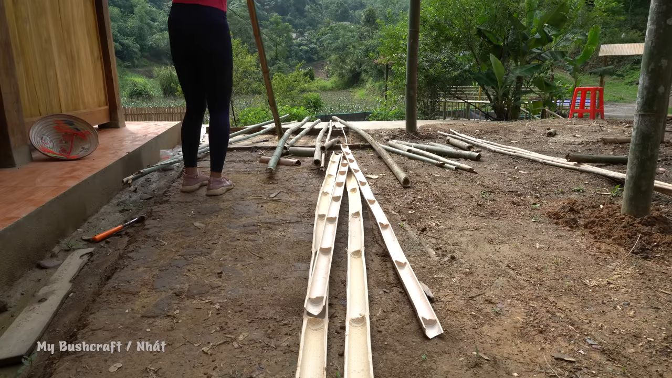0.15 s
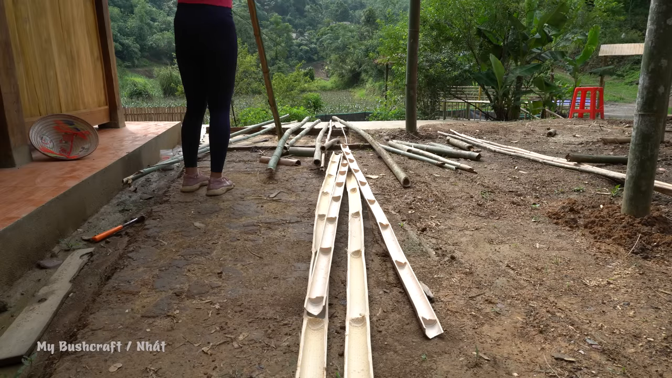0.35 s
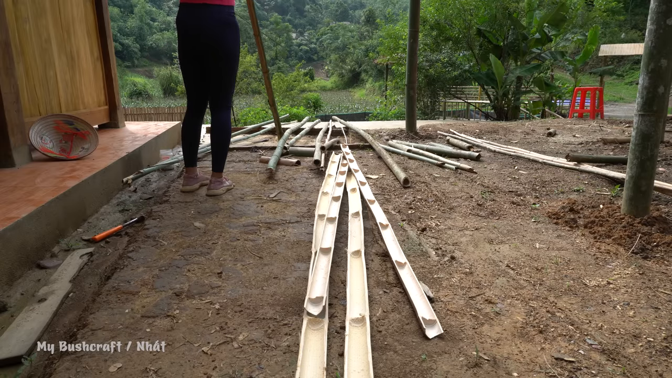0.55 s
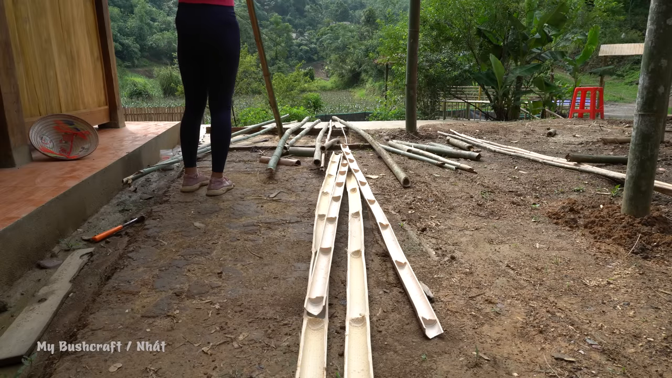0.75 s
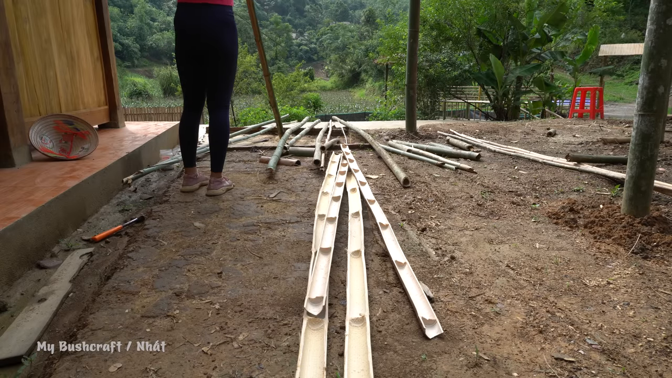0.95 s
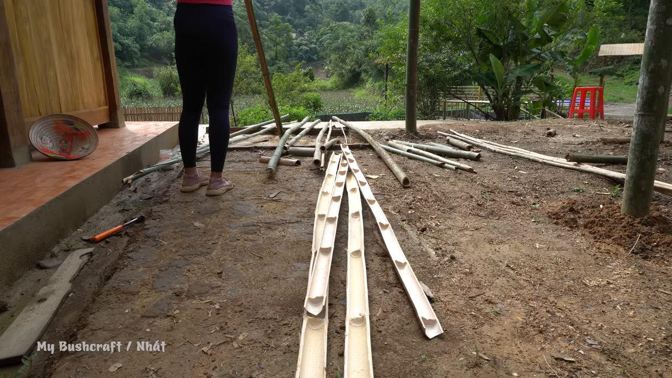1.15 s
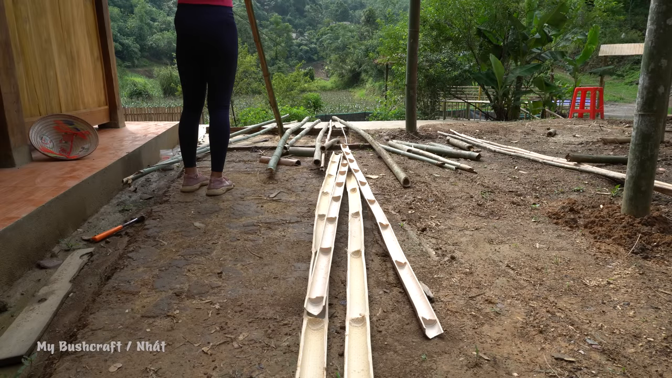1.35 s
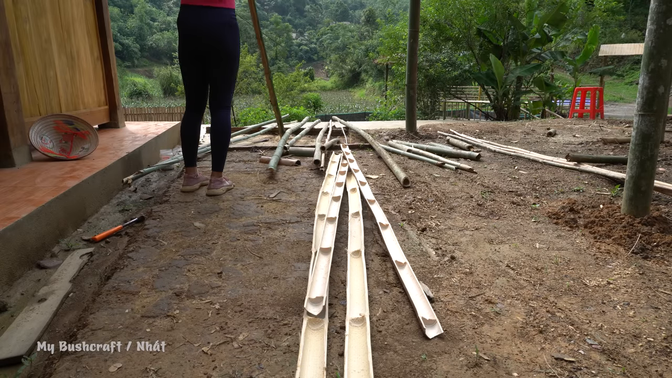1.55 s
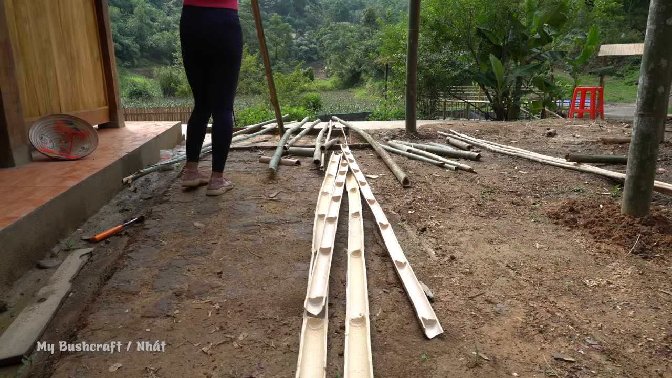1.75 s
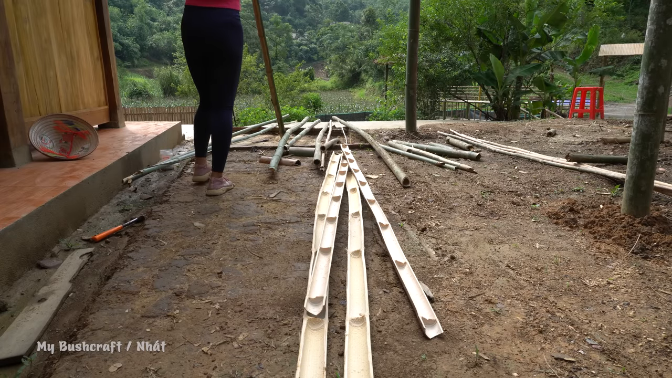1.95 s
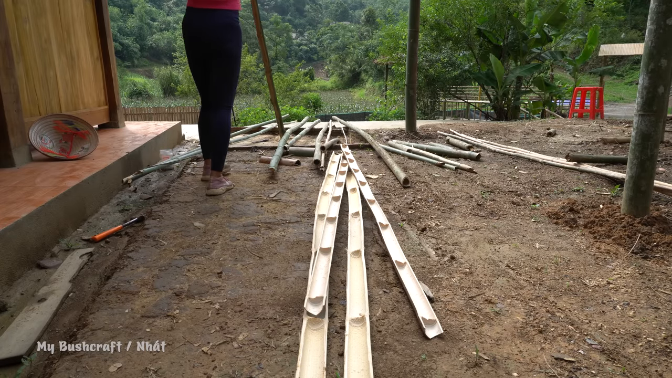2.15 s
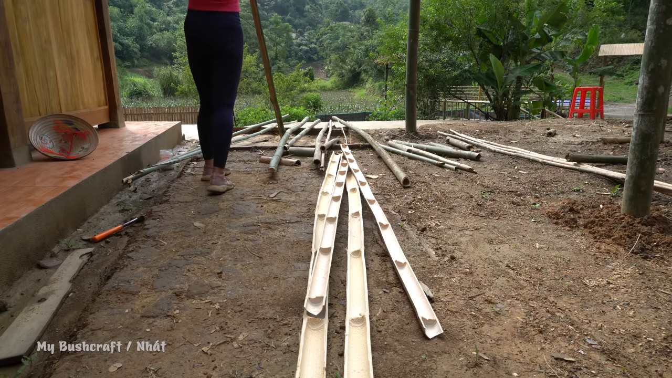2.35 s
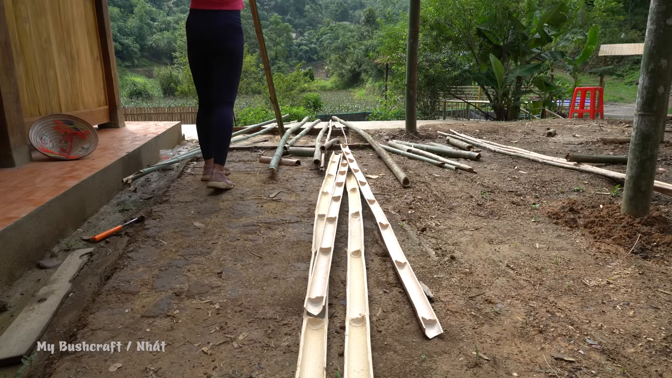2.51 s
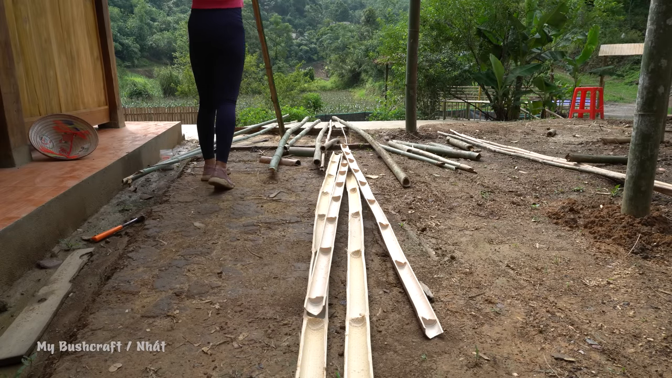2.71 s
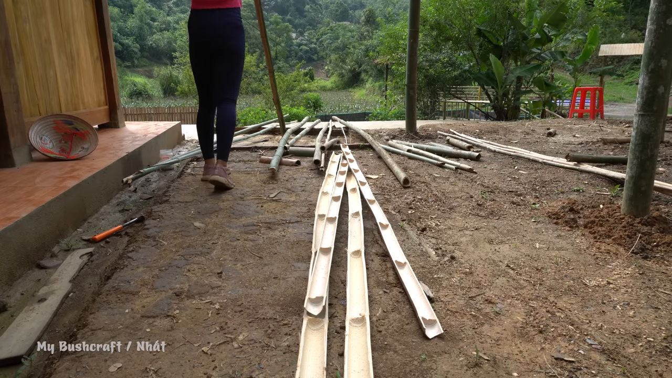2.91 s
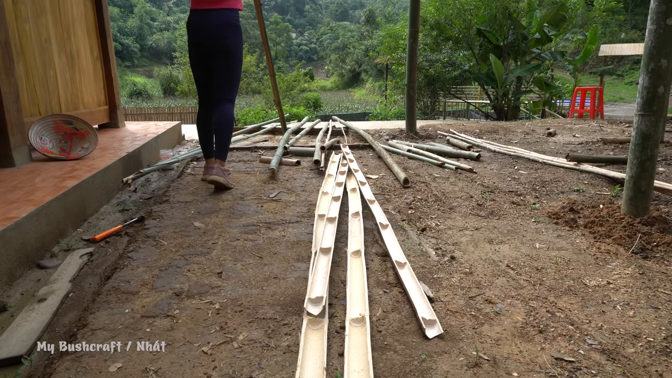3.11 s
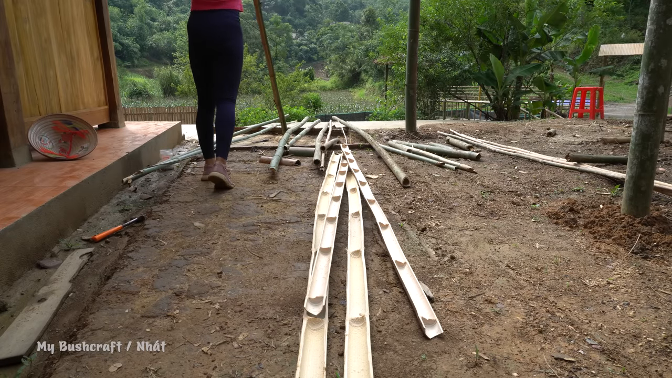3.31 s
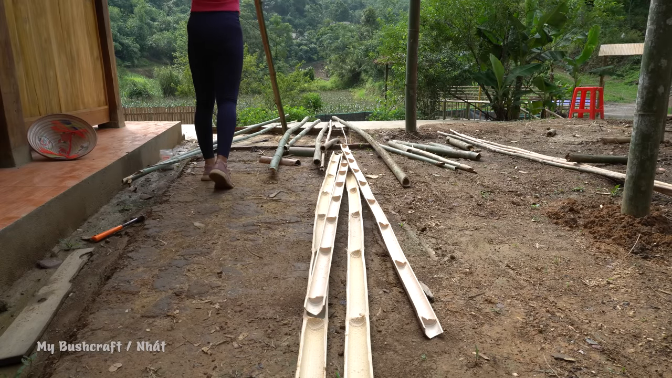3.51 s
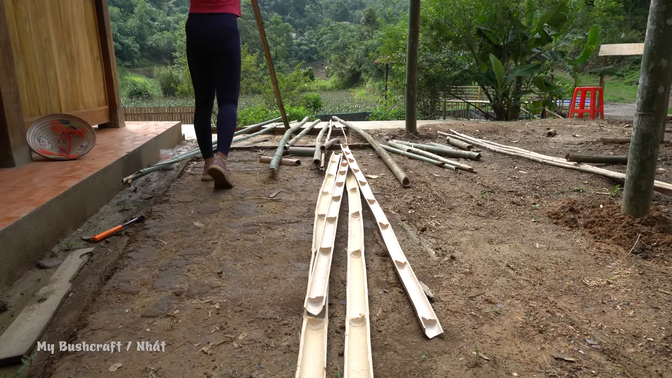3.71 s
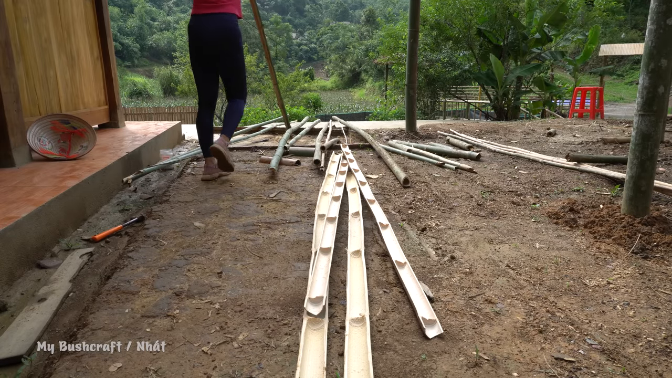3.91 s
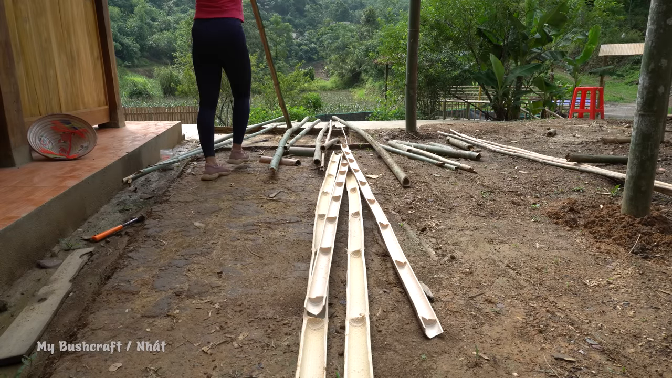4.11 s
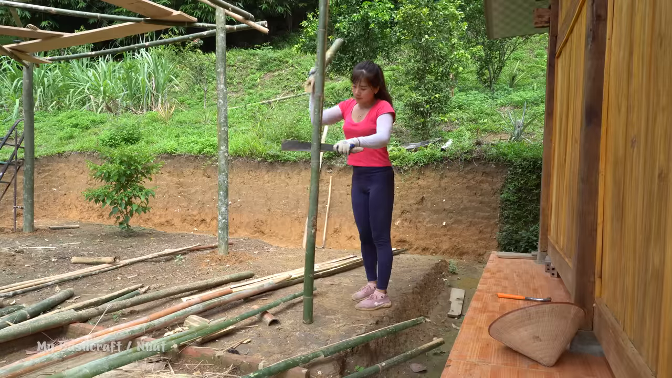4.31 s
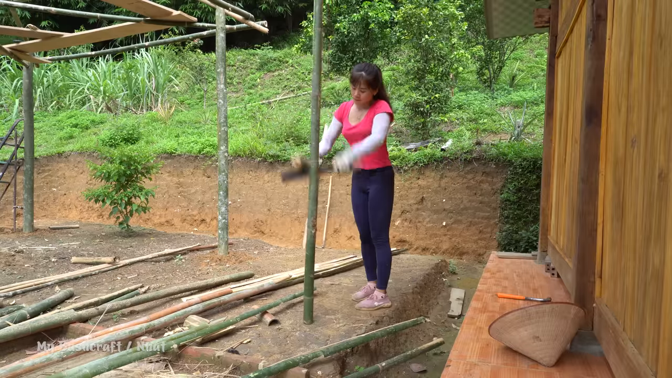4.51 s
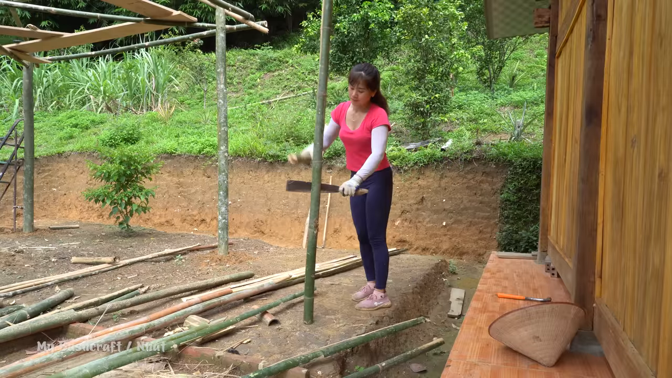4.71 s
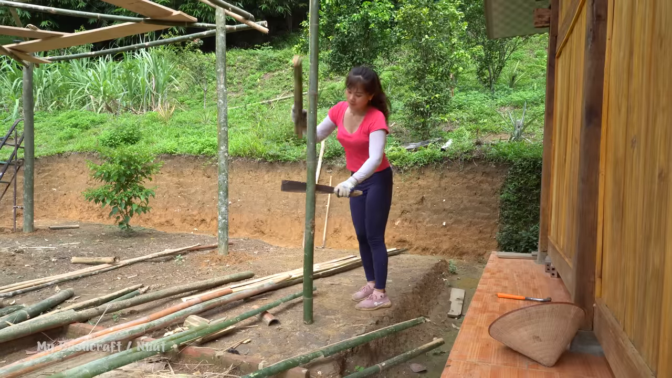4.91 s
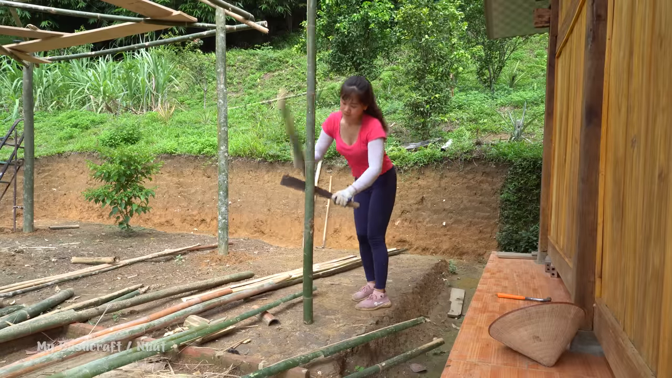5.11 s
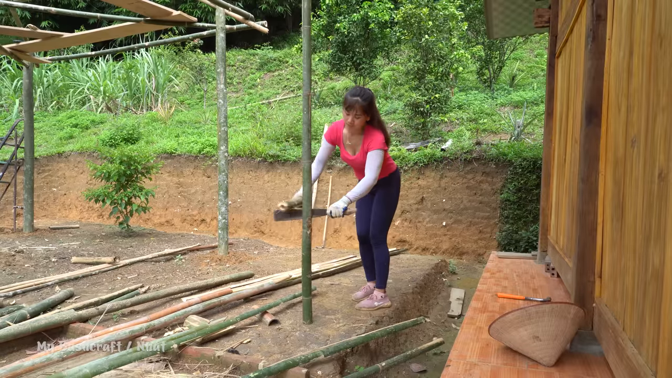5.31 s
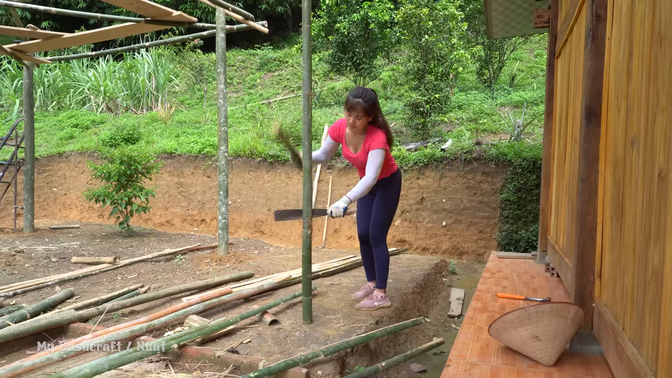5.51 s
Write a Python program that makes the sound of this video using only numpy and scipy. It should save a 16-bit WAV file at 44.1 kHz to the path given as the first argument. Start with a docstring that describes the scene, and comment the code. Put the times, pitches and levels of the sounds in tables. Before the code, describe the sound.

Bamboo splitting heard in stereo from a few metres away: five blows on one pole slightly left, the third only a soft thud, each followed by brief wall and ground echoes. Splits tear on in dry, uneven crackles. After an abrupt change of spot, two blows land on another pole, with longer echoes and a short rubbing hum before the last. Steady insect hiss continues behind.

```python
"""Splitting bamboo in a farmyard

A wooden club knocks a machete down through standing bamboo poles, a few metres away.
Most blows ring the hollow pole (fading sine tones, thud and crack of noise); the third is mainly a dull thud.
The split runs on in bursts of random fibre snaps; house wall and ground send back echoes of fading noise.
Insects (filtered noise) hiss in the trees; the last two blows hit a second pole, heard from another spot."""
import sys
import numpy as np
from scipy import signal
from scipy.fft import rfft, irfft, next_fast_len
from scipy.io import wavfile

SR = 44100
rng = np.random.default_rng(int(sys.argv[2]) if len(sys.argv) > 2 else 0)


def persist_wave(psi):
    """Save psi, clipped to +-1, as 16-bit WAV."""
    counts = np.round(np.clip(psi, -1, 1) * 32767).astype(np.int16)
    wavfile.write(sys.argv[1], SR, np.atleast_2d(counts).T)


N = 245195
TIME = np.arange(N) / SR

# All levels are relative. A fade_s is the time a sound takes to sink by 60 dB.
# blows: start_s, hollow_ring_db, ring_hz, wall_knock_db, club_thud_db, edge_crack_db, echo_fade_s, late_echo_db
BLOWS = [(0.6436, -8, 1542, -11, -19.5, -17.5, 0.23, -16.5),
         (1.3096, -6.5, 1529, -9, -18.5, -16, 0.19, -12), (1.8090, -56, 1310, -22, -14.5, -28, 0.12, -19.5),
         (2.9, -2, 1528, -6, -20.5, -11, 0.22, -13), (3.6032, -3, 1529, -8.5, -46, -15.5, 0.27, -7.5),
         (4.5550, -10.5, 1510, -9, -19, -9, 0.63, -3), (5.2407, -8.5, 1490, -8.5, -26, -16.5, 0.35, -10)]
# tones of the first pole's wall: pitch_hz, level_db, fade_s
FIRST_WALL = [(359, -29, 0.016), (605, -28, 0.099), (738, -17.5, 0.058), (951, -30, 0.11),
              (1410, -4, 0.0095), (1900, -39, 0.015), (2214, -6.5, 0.023), (3080, -32, .016),
              (3390, -8.5, 0.0064), (5530, -20.5, 0.015)]
# tones of the second pole's wall: pitch_hz, level_db, fade_s
SECOND_WALL = [(239, -22, 0.081), (424, -24.5, 0.083), (598, -18, 0.035), (780.6, -14, 0.1),
               (960, -10.5, 0.032), (1090, -21, 0.087), (1864, -12, 0.038), (2172, -9, 0.037),
               (2700, -14, 0.027), (3175, -16, 0.016), (4350, -11, 0.012)]
# wooden club on the back of the blade: pitch_hz, level_db
THUD = [(40, -47), (120, -19), (300, -16), (450, -0.5), (650, 6), (1000, -1), (1400, 2.5), (2000, -6.5),
        (3000, -15), (5000, -15), (16000, -39)]
# blade edge entering the cane: pitch_hz, level_db
CRACK = [(40, -45), (200, -18), (700, -10.5), (2000, 9), (4500, -6), (8000, -11), (12000, -9), (16000, -20)]
# the split running on: start_s, length_s, first_crackle_db, last_crackle_db, first_body_db, last_body_db
# It fades after a blow, or grows as the blade is levered; "body" is the shaking pole.
RUNS = [(0.66, 0.036, -28, -25, -22, -27.5), (0.72, 0.24, -37, -43, -36.5, -42),
        (1.323, 0.1, -53, -32.5, -25, -30.5), (2.162, 0.073, -42.5, -35.5, -46, -39),
        (2.719, 0.031, -30.5, -36.5, -39, -43.5), (2.811, 0.045, -33, -30, -56, -35.5),
        (2.952, 0.17, -22.5, -46, -20.5, -34), (3.548, 0.06, -50, -33, -59, -36),
        (3.627, 0.22, -33, -49, -25, -42), (4.088, 0.1, -47.5, -44, -51, -45.5),
        (4.603, 0.11, -32, -38, -16.5, -24.5), (5.27, 0.043, -23, -50, -22, -26.5)]
# loud jerks, where a whole bundle of fibres gives way: start_s, crackle_db, body_db
JERKS = [(0.726, -25.5, -24), (0.757, -26, -27), (0.784, -26.5, -22), (0.914, -34, -35),
         (1.328, -27.5, -18), (1.413, -30, -31), (2.17, -31.5, -43), (2.236, -27.5, -31.5),
         (2.779, -32.5, -55), (2.958, -21.5, -24), (2.994, -18, -31), (3.056, -20.5, -21),
         (3.094, -24, -23.5), (3.612, -18.5, -26), (4.556, -17.5, -49), (4.604, -21, -23)]
# snapping fibres: pitch_hz, level_db
FIBRES = [(300, -25.5), (1200, 1.5), (2600, 1), (4000, 2), (6000, 1.5), (8500, -1), (11000, -5.5),
          (14000, -5.5), (16000, -17.5)]
# the parted strips, rung by snapping fibres: pitch_hz, level_db, fade_s
STRIPS = [(1400, -9, 0.056), (2120, -8, 0.047), (2603, 3, 0.061), (2760, 3, 0.09), (3534, 3.5, 0.022),
          (3660, 6, 0.058), (4430, -27, 0.015), (5210, -12, 0.055)]
# the pole shaken by the split: pitch_hz, level_db
POLE = [(30, -40.5), (70, -22), (150, -12), (280, -4.5), (440, -10), (620, 3), (720, -5), (820, 3),
        (1050, -1.5), (1380, -3), (1800, -3), (2300, -6), (3200, -13.5), (6000, -18), (16000, -46)]
# woody bending tones of the first pole as it opens: pitch_hz, level_db, fade_s
FLEX = [(596, 0.5, 0.052), (632.6, -3.5, 0.054), (830, -31, 0.027)]
# insect chorus from each spot: pitch_hz, level_db
INSECTS_FIRST = [(1500, -21.5), (2200, -13.5), (2800, -8.5), (3400, -10.5), (4400, -7), (5100, -3.5),
                 (5650, 2), (6550, -11.5), (7500, -4.5), (8600, -8.5), (9600, -9), (10600, -18),
                 (12500, -22), (16000, -23.5)]
INSECTS_SECOND = [(1500, -29.5), (2100, -11), (2800, -5.5), (3300, -8.5), (4100, -1), (5000, -3), (5700, 3),
                  (6550, -7), (7600, 0), (9000, -5.5), (10200, -9), (11500, -15.5), (13000, -23),
                  (16000, -21)]
# thin insect whistles: pitch_hz, width_hz, level_db
WHISTLES = [(9200, 250, -58), (9990, 110, -60)]
# distant open-air rumble: pitch_hz, level_db
AIR = [(20, -9.5), (45, -7.5), (80, 2), (125, 1.5), (190, -7), (270, -4.5), (450, -9), (800, -11),
       (1500, -13.5), (2500, -25), (6000, -57), (16000, -56)]
# how alike left and right are, for far sounds and for the yard: pitch_hz, correlation
FAR_LIKENESS = [(60, 0.98), (130, 0.97), (290, 0.67), (640, 0.13), (1400, 0.14), (3000, 0.31), (7000, 0),
                (15000, 0.26)]
YARD_LIKENESS = [(100, 1), (500, 0.98), (1000, 0.89), (1600, 0.75), (3000, 0.44), (6000, 0.29),
                 (12000, 0.4)]

MOVE_S = 4.215   # from here on: second pole, other listening spot
HOLLOW_FADE_S = 0.019
# echo level and left-right balance of each pole's blows
FIRST_ECHO_DB, FIRST_SIDE_DB = 3.5, 1.4
SECOND_ECHO_DB, SECOND_SIDE_DB = 5.5, -1.2
RUN_ATTACK_S, CRACKLE_RELEASE_S, BODY_RELEASE_S = 0.0064, 0.004, 0.016
JERK_S = 0.011   # a jerk swells and dies on this time scale
# the cleft sticks and slips unevenly: each slip starts at once and sinks by SLIP_DB until the next
SLIPS_PER_S, SLIP_DB, SLIP_JITTER = 60, 7, 0.4
# the blade rubs in the cleft and the pole hums, swelling and sinking in pitch up to the last blow
RUB_START_S, RUB_END_S, RUB_RELEASE_S = 4.7, 5.238, 0.004
RUB_END_DB, RUB_SWELL_DB_PER_S = -44, 142
RUB_END_HZ, RUB_SAG_HZ_PER_S = 965, 750
CUTOFF_HZ = 15950


def amp(db):
    """Turn decibels into a plain factor."""
    return 10 ** (np.asarray(db) / 20)


def rms_one(x):
    """Scale a sound to an average strength (rms) of 1."""
    return x / np.sqrt(np.mean(x ** 2) + 1e-20)


def at_hz(points, hz):
    """Read a table between its points, on a logarithmic pitch scale."""
    table = np.array(points)
    return np.interp(np.log(hz + 1), np.log(table[:, 0]), table[:, 1])


def dying(t, fade_s):
    """Exponential fade that sinks by 60 dB in fade_s."""
    return np.exp(-np.log(1000) * t / max(fade_s, 1e-3))


def colour(x, spectrum):
    """Filter that follows a spectrum without sounding ahead of its input (minimum phase)."""
    size = 2 * next_fast_len(x.shape[-1])
    gain = amp(at_hz(spectrum, np.fft.rfftfreq(size, 1 / SR)))
    # folding the cepstrum onto positive times gives the minimum-phase response
    cepstrum = irfft(np.log(gain))
    cepstrum[1:size // 2] *= 2
    cepstrum[size // 2 + 1:] = 0
    response = np.exp(rfft(cepstrum))
    return irfft(rfft(x, size) * response)[..., :x.shape[-1]]


def spread(pair, likeness):
    """Mix two unrelated signals into left and right, more or less alike at each pitch."""
    length = pair.shape[-1]
    size = 2 * next_fast_len(length // 2 + 1)
    mid, side = rfft(pair, size)
    alike = np.clip(at_hz(likeness, np.fft.rfftfreq(size, 1 / SR)), -1, 1)
    left_right = np.sqrt(1 + alike) * mid + np.sqrt(1 - alike) * side * [[1], [-1]]
    return irfft(left_right)[:, :length]


def drift(rate):
    """Random wandering: straight lines between chance values of spread 1, rate values a second."""
    knots = rng.standard_normal(N // 20)
    return np.interp(TIME * rate, np.arange(len(knots)), knots)


def pan(db):
    """Left and right factors that differ by db; positive leans left."""
    return amp([[db / 2], [-db / 2]])


def add(out, s, sound):
    """Mix a sound into out from time s, cutting what runs past the end."""
    at = round(s * SR)
    out[:, at:at + sound.shape[-1]] += sound[:, :N - at]


def ringing(modes, t, scatter_db):
    """Struck wood rings in fading sine tones, each with a chance strength on every strike."""
    total = 0
    for k, (hz, db, fade_s) in enumerate(modes):
        strength = amp(db + scatter_db * rng.standard_normal())
        tone = np.sin(2 * np.pi * hz * t) * dying(t, fade_s)
        total = total + (-1) ** k * strength * tone
    return total


def yard(fade_s, late_db, build_s=0.0054, hold_s=0.017, late_fade_s=0.97, damp_hz=4200, lumpy_db=3.0):
    """One second of echoes: a dense cluster off wall, eaves and ground, then a dull hillside tail."""
    t = TIME[:SR]
    sizes = rng.standard_normal((2, SR)) * amp(lumpy_db * rng.standard_normal(SR))
    near_shape = (1 - np.exp(-t / build_s)) * dying(np.maximum(t - hold_s, 0), fade_s)
    near = spread(sizes, YARD_LIKENESS) * near_shape
    far_shape = (1 - np.exp(-t / hold_s)) * dying(t, late_fade_s)
    far = spread(rng.standard_normal((2, SR)), YARD_LIKENESS) * far_shape
    dull_far = signal.lfilter(*signal.butter(2, damp_hz, fs=SR), far)
    # average energy of 1 per ear
    return rms_one(near + amp(late_db) * dull_far) / np.sqrt(SR)


def far_noise(spectrum, waver_db, waver_rate):
    """Many distant sources blend into coloured noise, whose level wavers by waver_db."""
    noise = colour(spread(rng.standard_normal((2, N)), FAR_LIKENESS), spectrum)
    return rms_one(noise) * amp(waver_db * drift(waver_rate))


def narrow_tone(hz, width_hz):
    """A thin stereo tone whose level and phase wander: slow noise shifted up to hz."""
    slow = signal.butter(2, width_hz / 2, fs=SR, output="sos")
    noise = rng.standard_normal((2, N)) + 1j * rng.standard_normal((2, N))
    wander = signal.sosfilt(slow, noise)
    return rms_one(np.real(wander * np.exp(2j * np.pi * hz * TIME)))


def outdoors(first_db=-44.0, second_db=-42.5, first_air_db=-53.5, second_air_db=-55.5,
             drone_db=-61.0, drone_hz=255):
    """Insects and rumble as noise; the first spot has thin whistles, the second a faint far drone."""
    air = far_noise(AIR, waver_db=-0.15, waver_rate=4.9)
    first = amp(first_db) * far_noise(INSECTS_FIRST, waver_db=0.0, waver_rate=14) * pan(db=0.5)
    first += sum(amp(db) * narrow_tone(hz, width) for hz, width, db in WHISTLES)
    second = amp(second_db) * far_noise(INSECTS_SECOND, waver_db=0.6, waver_rate=4.1) * pan(db=-1.2)
    second += amp(drone_db) * narrow_tone(drone_hz, width_hz=15)
    return np.where(TIME < MOVE_S, first + amp(first_air_db) * air, second + amp(second_air_db) * air)


def blow(wall_modes, ring_db, ring_hz, knock_db, thud_db, crack_db, crack_fade_s=0.014,
         thud_fade_s=0.028, linger_db=-20.5, linger_fade_s=0.37, bite_db=15.0):
    """The club's thud, the hollow's ring, the wall's knock and the edge's crack, each at its own level."""
    t = TIME[:SR // 8]
    # the ring drops quickly, then lingers faintly
    ring_fade = dying(t, HOLLOW_FADE_S) + amp(linger_db) * dying(t, linger_fade_s)
    hollow = np.sin(2 * np.pi * ring_hz * t) * ring_fade
    wall = ringing(wall_modes, t, scatter_db=1.0)
    thud = rms_one(colour(rng.standard_normal(len(t)), THUD)) * dying(t, thud_fade_s)
    # the edge bites with one sharp click, and fibres give way just behind it
    bite = rng.standard_normal(len(t)) - amp(bite_db) * (t == 0)
    crack = rms_one(colour(bite, CRACK)) * dying(t, crack_fade_s)
    return amp(knock_db) * wall + amp(thud_db) * thud + amp(crack_db) * crack - amp(ring_db) * hollow


def chops(count=4):
    """Blows arrive directly, then as echoes; the cane sends a slightly different sound each way."""
    first, second = np.zeros((2, 2, N))
    for s, ring_db, ring_hz, knock_db, thud_db, crack_db, fade_s, late_db in BLOWS:
        if s < MOVE_S:
            out, wall_modes, echo_db, side_db = first, FIRST_WALL, FIRST_ECHO_DB, FIRST_SIDE_DB
        else:
            out, wall_modes, echo_db, side_db = second, SECOND_WALL, SECOND_ECHO_DB, SECOND_SIDE_DB
        direct, *sideways = [blow(wall_modes, ring_db, ring_hz, knock_db, thud_db, crack_db)
                             for _ in range(count)]
        echoes = sum(signal.fftconvolve(ray[None], yard(fade_s, late_db), axes=1) for ray in sideways)
        # set the echo energy from the average energy of the sideways sounds, in two ears
        ray_energy = np.sum(np.square(sideways)) / len(sideways)
        echoes *= amp(echo_db) * np.sqrt(2 * ray_energy / np.sum(echoes ** 2))
        add(out, s, direct * pan(side_db / 2))
        add(out, s, echoes * pan(side_db))
    # the first pole stands to the left and reaches the right ear two samples later
    first[1] = np.roll(first[1], 2)
    return np.where(TIME < MOVE_S, first, second)


def slipping():
    """Stick and slip: a sawtooth of strength in dB at uneven intervals; rms 1."""
    gaps = np.exp(SLIP_JITTER * rng.standard_normal(N // 100)) / SLIPS_PER_S
    stuck = np.interp(TIME, np.cumsum(gaps), np.arange(len(gaps))) % 1
    return rms_one(amp(-SLIP_DB * stuck))


def tearing():
    """Strength of crackle and shaking: fading or growing runs that stick and slip, and single jerks."""
    bright, shake = np.zeros((2, N))
    for s, length, first_db, last_db, first_body_db, last_body_db in RUNS:
        span, after = [s, s + length], np.maximum(TIME - s - length, 0)
        attack = np.clip((TIME - s) / RUN_ATTACK_S, 0, 1)
        crackle_level = amp(np.interp(TIME, span, [first_db, last_db]))
        body_level = amp(np.interp(TIME, span, [first_body_db, last_body_db]))
        bright += attack * crackle_level * np.exp(-after / CRACKLE_RELEASE_S)
        shake += attack * body_level * np.exp(-after / BODY_RELEASE_S)
    slips = slipping()
    bright, shake = bright * slips, shake * slips
    for s, crackle_db, body_db in JERKS:
        age = np.clip((TIME - s) / JERK_S, 0, 10)
        burst = np.sqrt(2 * np.e * age) * np.exp(-age * (1 + age / 2))
        # unrelated sounds add by energy
        bright = np.hypot(bright, amp(crackle_db) * burst)
        shake = np.hypot(shake, amp(body_db) * burst)
    return bright, shake


def splitting(snaps_per_s=2200, size_db=5.0, crackle_db=-0.5, strips_db=-11.0, body_db=-4.5,
              flex_db=-9.5, echo_db=-5.0, first_side_db=7.5, crackle_side=0.44):
    """Fibres snap at random in bursts; the snaps crackle, ring the strips and shake the pole."""
    bright, shake = tearing()
    sizes = amp(size_db * np.minimum(rng.exponential(1, (2, N)), 2)) * rng.choice([-1, 1], (2, N))
    happens = rng.random((2, N)) < snaps_per_s / SR
    snaps = spread(sizes * happens, YARD_LIKENESS)
    # the first pole's strips and crackle lean left;
    # the second pole's splitting is centred, though its blows lean slightly right
    side = np.where(TIME < MOVE_S, pan(first_side_db), 1)
    t = TIME[:SR // 8]
    strips = signal.fftconvolve(snaps, ringing(STRIPS, t, scatter_db=2.0)[None], axes=1)[:, :N]
    strips = amp(strips_db) * rms_one(strips) * side
    # the crackle leans less than the strips
    crackle = amp(crackle_db) * rms_one(colour(snaps, FIBRES)) * side ** crackle_side
    flex = signal.fftconvolve(snaps, ringing(FLEX, t, scatter_db=2.5)[None], axes=1)[:, :N]
    flex = amp(flex_db) * rms_one(flex) * (TIME < MOVE_S)
    body = amp(body_db) * rms_one(colour(snaps, POLE)) + flex
    dry = bright * (strips + crackle) + shake * body
    echo_pattern = yard(fade_s=0.32, late_db=-12.5, hold_s=0.0081)
    echoes = signal.fftconvolve(dry, echo_pattern, axes=1)[:, :N]
    return dry + amp(echo_db) * echoes


def rubbing(rough=0.776):
    """The blade rubs in the cleft: a short, uneven hollow hum before the last blow."""
    ahead, after = np.maximum(RUB_END_S - TIME, 0), np.maximum(TIME - RUB_END_S, 0)
    swell = (TIME > RUB_START_S) * amp(RUB_END_DB - RUB_SWELL_DB_PER_S * ahead)
    level = swell * np.exp(-after / RUB_RELEASE_S)
    hz = RUB_END_HZ + RUB_SAG_HZ_PER_S * ahead
    phase = 2 * np.pi * np.cumsum(hz) / SR + rough * drift(400)
    return level * rms_one((1 + rough * drift(120)) * np.sin(phase))


def scene():
    """Insects and air, blows, splitting and rubbing, all added together."""
    return outdoors() + chops() + splitting() + rubbing()


def record(dry):
    """Loud peaks are rounded off, then a steep filter cuts the top."""
    steep = signal.ellip(12, 0.1, 80, CUTOFF_HZ, fs=SR, output="sos")
    top = 0.8
    rounded = top * np.tanh(dry / top)
    return signal.sosfilt(steep, rounded)


dry = scene()
out = record(dry)
persist_wave(out)
```